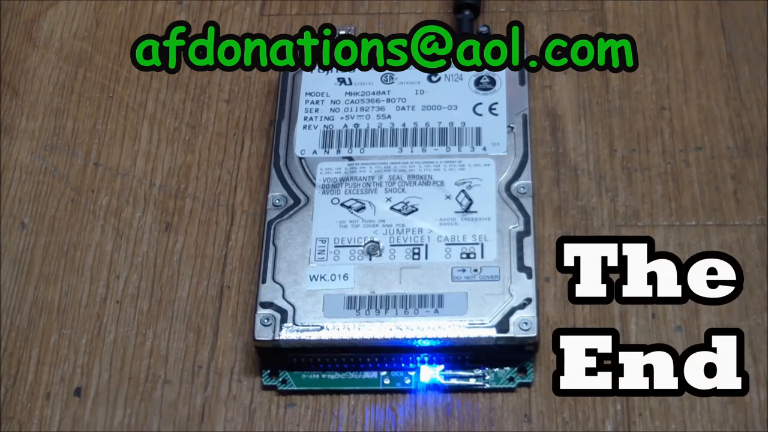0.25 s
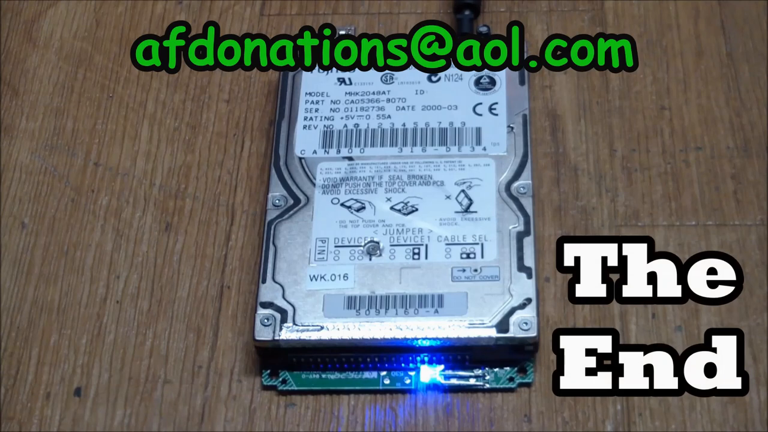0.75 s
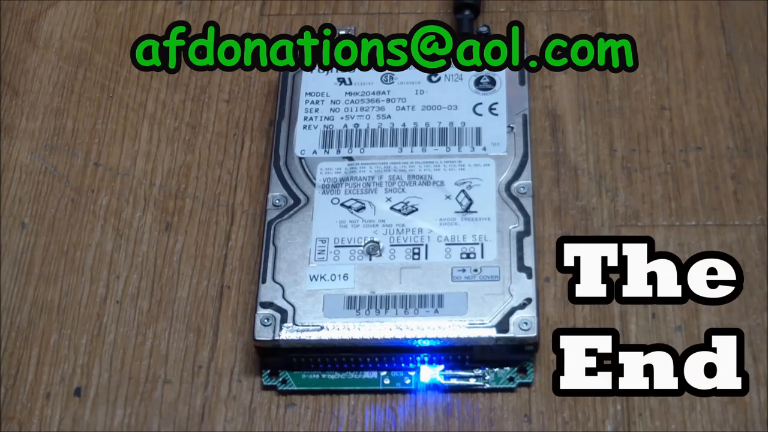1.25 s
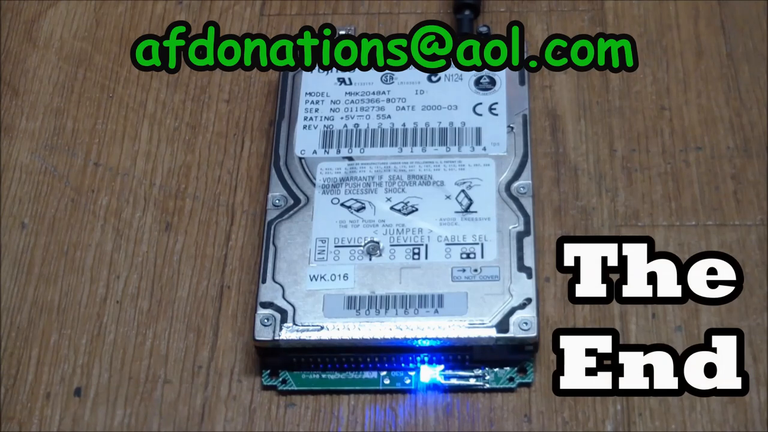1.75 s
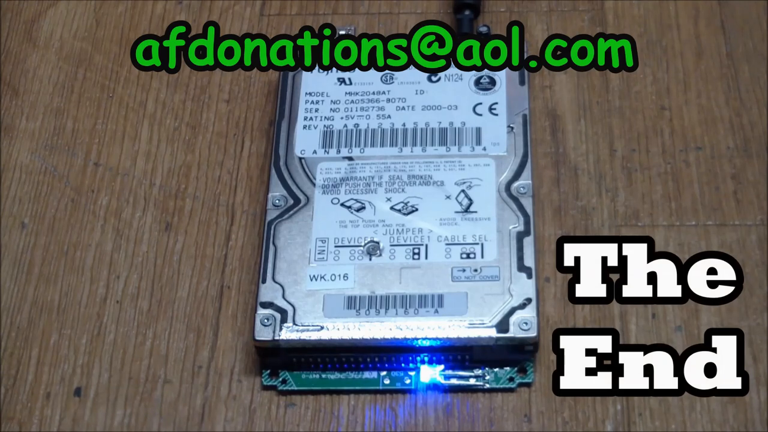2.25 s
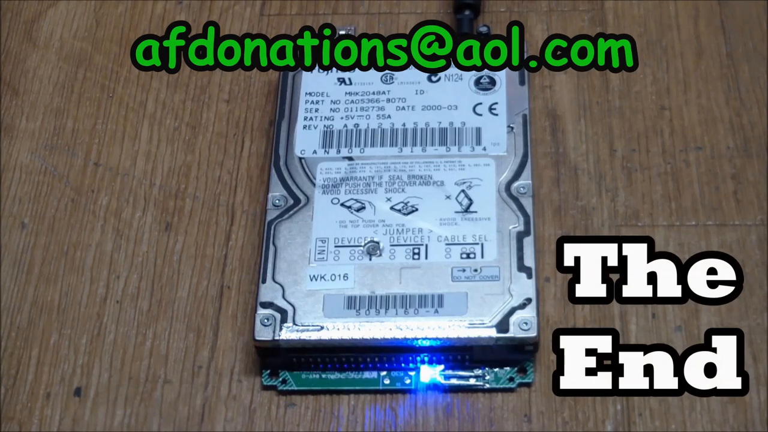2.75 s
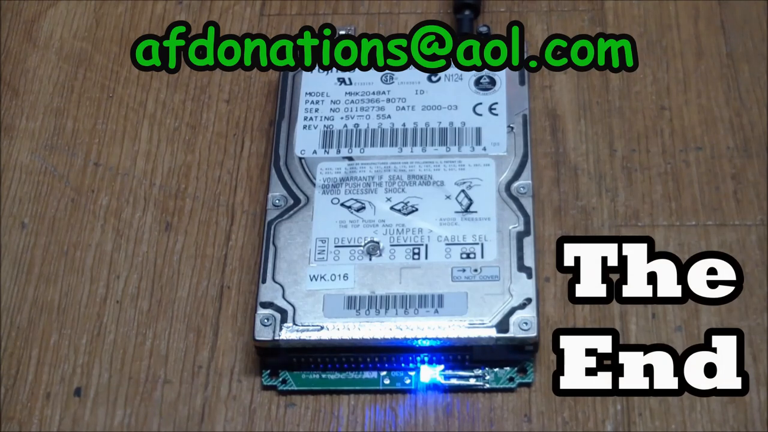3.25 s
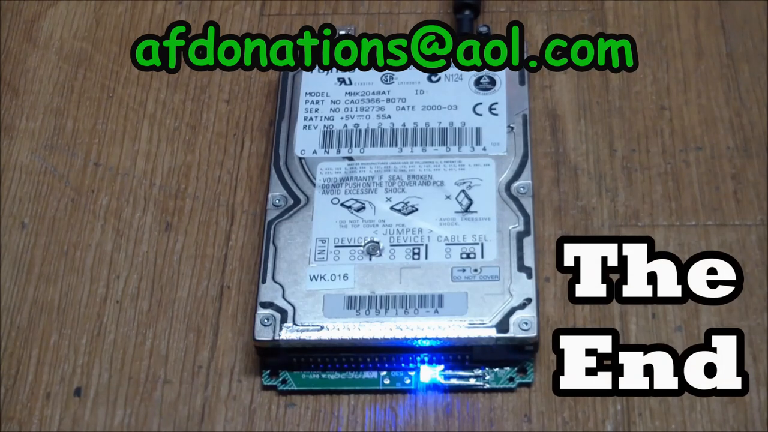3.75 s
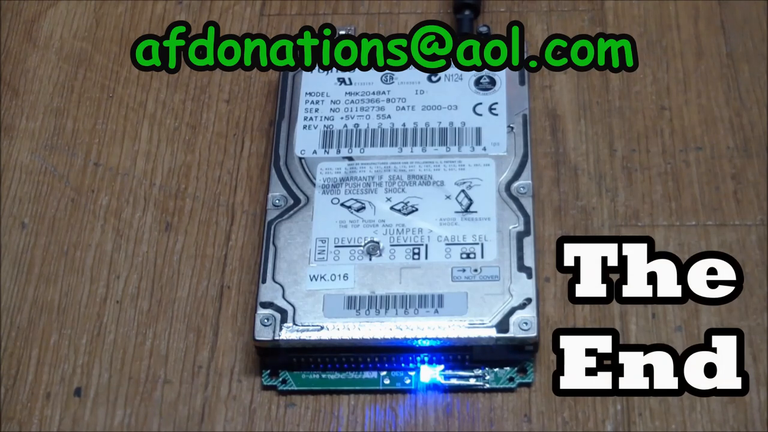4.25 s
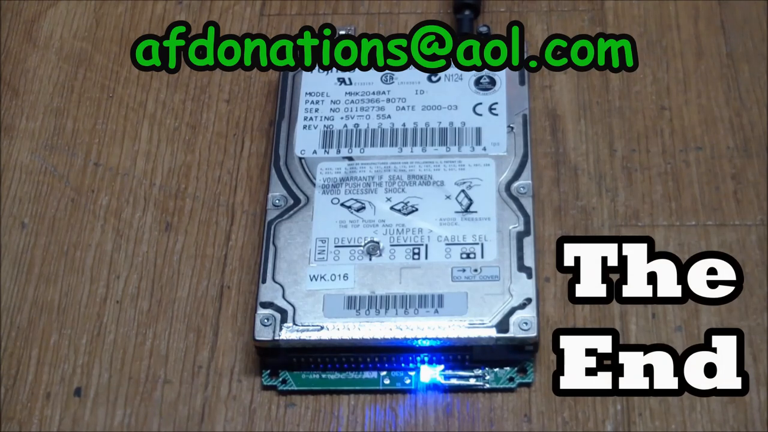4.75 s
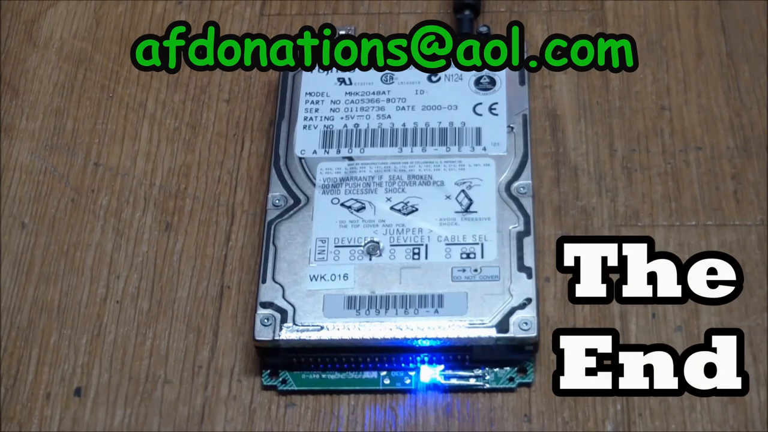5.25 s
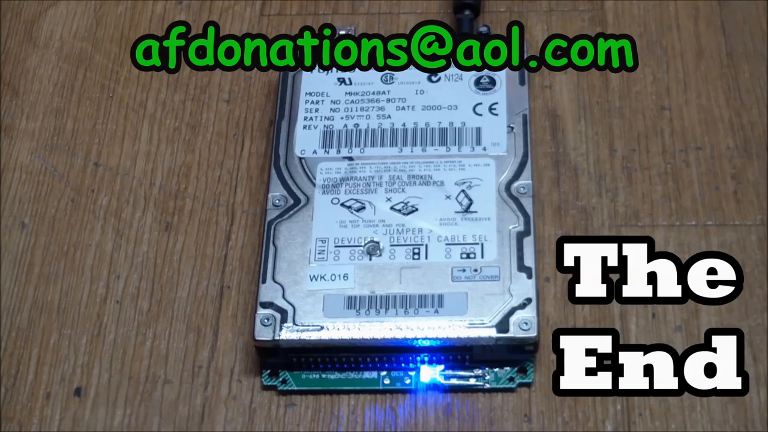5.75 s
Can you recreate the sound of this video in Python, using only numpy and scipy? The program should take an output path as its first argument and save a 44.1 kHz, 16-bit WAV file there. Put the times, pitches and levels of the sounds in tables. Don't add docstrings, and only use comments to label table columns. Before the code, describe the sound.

Sharp, loud clacks from a small disc drive on wood repeat in a regular limping rhythm above faint multi-toned whining, hiss and low rumble.

```python
import sys
import numpy as np
from scipy import signal
from scipy.fft import rfft, irfft, next_fast_len
from scipy.io import wavfile
from scipy.ndimage import uniform_filter1d

SR = 44100
rng = np.random.default_rng(int(sys.argv[2]) if len(sys.argv) > 2 else 0)


def dump_mix(stems):
    frames = np.atleast_2d(stems).T
    limited = np.clip(frames, -1, 1)
    pcm = np.round(limited * 32767).astype(np.int16)
    wavfile.write(sys.argv[1], SR, pcm)


def boost_factor(decibels):
    exponent = np.asarray(decibels, float) / 20
    return 10 ** exponent


N = 263718


def on_log(table, hz):
    f, v = np.transpose(table)
    return np.interp(np.log(np.maximum(hz, 1)), np.log(f), v)


def shaped(x, gain):
    size = next_fast_len(N)
    return irfft(rfft(x, size) * gain(np.fft.rfftfreq(size, 1 / SR)), size)[:N]


def noise(gain):
    return shaped(rng.standard_normal(N), gain)


def walk(rate_hz):
    hold = int(SR / rate_hz)
    levels = np.repeat(rng.standard_normal(N // hold + 1), hold)
    return 1.3 * uniform_filter1d(uniform_filter1d(levels, hold), hold)[:N]


def add(out, sound, start_s):
    i = round(start_s * SR)
    out[i:i + len(sound)] += sound[:N - i]


def rings(hz, t60_s):
    t = np.arange(SR // 5) / SR
    return np.exp(np.outer(2j * np.pi * hz - np.log(1000) / t60_s, t)).imag


BALL_HZ, CAGE_HZ = 192.885, 29.68
# ball_multiple, cage_multiple, level_db (rms), beat_loudest_s, swell_highest_s
STRONG_LINES = [(12, -1, -60.5, 3.47, 3.0), (12, 1, -55.1, 0.66, 3.0), (14, -1, -68.4, 1.42, 3.0),
                (20, 1, -59.4, 1.79, 8.5), (22, -1, -60.5, 1.98, 8.5), (22, 1, -54.2, 1.35, 4.0),
                (23, -1, -61.6, 1.47, 3.0), (24, -1, -61.2, 0.83, 7.0), (24, 1, -59.4, 0.17, 10.0),
                (25, 1, -64.7, 1.67, 4.5), (26, -1, -62.7, 0.61, 10.5), (26, 1, -51.0, 0.92, 10.0),
                (26, 2, -67.4, 1.68, 2.5), (28, 1, -66.3, 0.43, 4.0), (30, 0, -55.8, 1.12, 9.0),
                (30, 1, -59.8, 1.39, 8.5), (32, 0, -66.6, 0.74, 2.5), (36, 0, -64.2, 0.55, 2.0),
                (38, 0, -66.4, 0.89, 3.5), (42, 0, -62.8, 0.52, 10.0), (46, 0, -65.1, 0.0, 9.5),
                (54, 0, -66.4, 0.22, 2.5), (54, 1, -63.3, 0.48, 7.5), (66, -1, -69.8, 0.09, 2.0)]
# pitch_hz, level_db (rms)
CARRIER_LEVELS = [(2700, -71), (5400, -66.5), (6600, -71.5), (8800, -68), (11000, -72), (12000, -79),
                  (14700, -79)]
# pitch_hz, level_db (rms)
SIDEBAND_LEVELS = [(2900, -71.5), (3600, -71), (4500, -66), (6000, -68.5), (8000, -74.5), (9600, -71.5),
                   (11500, -78), (14700, -73.5)]
# pitch_hz, change_db
ODD_MULTIPLES = [(2900, -12), (4400, -2), (5200, -5), (7100, -4), (9000, -9.5), (12000, -5), (14500, -2.5)]


def bearing_lines(lowest=14, highest=80, heard=80, scatter_db=1.5):
    taken = [tuple(row[:2]) for row in STRONG_LINES]
    pairs = [(b, c) for b in range(lowest, highest + 1) for c in (-1, 0, 1) if (b, c) not in taken]
    ball, cage = np.transpose(pairs)
    hz = ball * BALL_HZ + cage * CAGE_HZ
    scatter, swell_time, beat_time = rng.standard_normal((len(ball), 3)).T
    db = np.where(cage == 0, on_log(CARRIER_LEVELS, hz), on_log(SIDEBAND_LEVELS, hz))
    db = db + on_log(ODD_MULTIPLES, hz) * (ball % 2) + scatter_db * scatter
    rows = np.transpose([ball, cage, db, 10 * beat_time, 10 * swell_time])
    return np.vstack([STRONG_LINES, rows[np.argsort(-db)[:heard]]]).T


def comb(turns_s, hz, start, lean, sizes, slips):
    out = np.zeros((2, N), np.float32)
    for k in range(len(hz)):
        cycles = hz[k] * turns_s + start[k] + slips[k % len(slips)]
        angle = np.float32(2 * np.pi * (cycles - np.rint(cycles)))
        size = np.repeat(np.float32(sizes[k]), 256)[:N]
        out[0] += size * np.sin(angle)
        out[1] += np.float32(lean[k]) * size * np.cos(angle)
    return out


def spindle(kick=.0025, sag=0.001983, swell_db=.5, side_db=-12, trim_db=0.44):
    t, speed = np.arange(N) / SR, 1 + .0001 * walk(2.95)
    changes = [(s - .07, kick) for s, _ in REBOUNDS] + [(s + 0.018, -sag) for s, _ in LONE_STEPS]
    for s, share in changes:
        late = np.maximum(t - s, 0) / 0.0477
        speed = speed + share * late * np.exp(1 - late)
    ball, cage, db, loudest_s, highest_s = bearing_lines()[:, :, None]
    slow = t[::256]
    beat_hz, second_share = .021, .42
    beat = np.abs(1 + second_share * np.exp(2j * np.pi * beat_hz * ball * (slow - loudest_s)))
    tide_s, tide_db = 12, 4
    tide = tide_db * np.cos(2 * np.pi * (slow - highest_s) / tide_s)
    swells = np.array([swell_db * walk(1.5)[::256] for _ in range(7)])
    swell = swells[np.arange(len(db)) % len(swells)]
    sizes = np.sqrt(2) * beat * boost_factor(db + trim_db + tide + swell)
    slips = np.array([.3 * walk(1.5) for _ in range(7)])
    start, lean = rng.random((len(db), 2)).T
    lag = np.sign(lean - .5) * boost_factor(side_db - 14 * lean)
    hz = (ball * BALL_HZ + cage * CAGE_HZ)[:, 0]
    mid, side = comb(np.cumsum(speed) / SR, hz, start, lag, sizes, slips)
    return np.array([mid + side, mid - side])


# pitch_hz, level_db (rms), waver_db
HUM_LINES = [(60.5, -53, 2.5), (120.3, -47.5, 1.5), (170, -61, 2.5), (801.3, -54.5, .8), (1929, -69, 2)]


def hum():
    t, out = np.arange(N) / SR, 0
    for hz, db, waver_db in HUM_LINES:
        level = boost_factor(db + waver_db * walk(3.95)) * np.sqrt(2)
        out = out + level * np.sin(2 * np.pi * hz * t + 0.93 * walk(1.917))
    return out


# pitch_hz, density_db (per Hz)
AIR_COMMON = [(20, -68.5), (36, -74.5), (60, -72.5), (100, -63.5), (140, -70.5), (300, -86.5), (700, -88),
              (1500, -91.5), (3000, -93.5), (4400, -88.5), (6500, -91), (11500, -94.5), (15000, -96)]
# pitch_hz, density_db (per Hz)
AIR_OPPOSITE = [(20, -79), (200, -84), (700, -93), (1500, -95), (3000, -104), (4400, -101), (5200, -100),
                (11500, -101), (15000, -99)]


def air():
    mid = noise(lambda f: boost_factor(on_log(AIR_COMMON, f)))
    side = noise(lambda f: boost_factor(on_log(AIR_OPPOSITE, f)))
    return boost_factor(0.87 * walk(7.8)) * np.sqrt(SR / 2) * np.array([mid + side, mid - side])


# start_s, level_db, centre_hz
SOFT_KNOCKS = [
    (.002, -49.5, 860),
    (3.333, -40, 590),
    (4.252, -42, 367),
    (5.956, -47, 900),
]


def knocks():
    out, t = 0, np.arange(N) / SR
    for s, db, hz in SOFT_KNOCKS:
        body = noise(lambda f: 1 / (1.1 + (f / hz - hz / (f + 1)) ** 2))
        decay = (t > s) * np.exp(-np.abs(t - s) / 0.023)
        out = out + boost_factor(db) * body / body.std() * decay
    return out


# start_s, level_db
DOUBLE_STEPS = [(0.374, -38.5), (1.393, -41.5), (2.412, -41), (3.93, -41.5), (4.953, -40.5)]
# start_s, level_db
LONE_STEPS = [(0.88, -40.5), (1.9, -41), (3.419, -41), (4.439, -41), (5.456, -41)]
# pitch_hz, t60_s, level_db
ARM_MODES = [(867, 0.11, 1), (1416, 0.092, -15), (1930, 0.074, -16), (4510, 0.024, 2.5), (4740, 0.022, -10),
             (5900, 0.014, -8)]


def coil_steps(scratch_db=-6, sway_db=-3):
    hz, t60_s, db = np.transpose(ARM_MODES)
    three_steps = [(0, 8), (.0108, 3.5), (.0205, 3)]  # delay_s, level_db
    shudder = [(0, 0), (.005, 0.5)]
    steps = [(s + late, level + more) for s, level in LONE_STEPS for late, more in three_steps]
    steps += [(s + late, level + more) for s, level in DOUBLE_STEPS for late, more in shudder]
    out, grit = np.zeros((2, N))
    modes, t = rings(hz, t60_s), np.arange(SR // 10) / SR
    for (s, level), chance in zip(steps, rng.standard_normal((len(steps), len(hz)))):
        add(out, boost_factor(level + db + 0.95 * chance) @ modes, s)
        add(grit, boost_factor(level + scratch_db) * np.exp(-t / 0.009), s)
    sway = t / 0.0032 * np.exp(1 - t / 0.0052) * np.sin(2 * np.pi * 470 * t)
    for s, level in LONE_STEPS:
        add(out, boost_factor(level + sway_db) * sway, s + 0.00926)
    return out + grit * noise(lambda f: 2 / (1 + ((f - 4000) / 1800) ** 2))


# pitch_hz, t60_s, then signed swing [ratio] for blow, lone_blow, rebound
CASE_MODES = [(408.1, 0.139, -0.015, -0.015, -0.001), (493.3, 0.116, -0.01, -0.01, -0.014),
              (663.2, 0.044, -0.017, -0.004, 0.001), (809.4, 0.048, 0.212, 0.229, 0.073),
              (819.4, 0.169, 0.038, 0.037, 0.02), (843.7, 0.098, 0.159, 0.141, 0.112),
              (878.5, 0.127, 0.173, 0.216, 0.476), (881.2, 0.11, -0.355, -0.403, -0.623),
              (900.1, 0.074, -0.298, -0.309, -0.035), (939.6, 0.038, -0.079, -0.095, -0.101),
              (1031.3, 0.055, 0.026, 0.015, 0.01), (1106.5, 0.098, -0.001, -0.009, -0.001),
              (1187.2, 0.009, -0.343, -0.376, -0.183), (1236.7, 0.184, 0.006, 0.01, 0.003),
              (1287.0, 0.032, 0.117, 0.132, 0.037), (1293.8, 0.105, -0.03, -0.034, -0.015),
              (1390.1, 0.021, 0.16, 0.196, 0.056), (1590.9, 0.03, 0.027, 0.057, -0.042),
              (1633.0, 0.032, 0.204, 0.215, 0.109), (1856.1, 0.092, 0.033, 0.037, 0.01),
              (2150.4, 0.005, 0.223, 0.285, 0.078), (2375.3, 0.029, -0.018, -0.03, -0.002),
              (2592.7, 0.011, -0.017, -0.054, 0.009), (2989.3, 0.005, 0.052, 0.037, 0.069),
              (3449.4, 0.016, -0.053, -0.09, 0.044)]
# start_s, level_db
DOUBLE_BLOWS = [(0.4396, 0.5), (1.458, 0.0), (2.47646, 0), (3.9963, 0.5), (5.0153, 0)]
# start_s, level_db
REBOUNDS = [(0.5011, -1.5), (1.518, -0.5), (2.5364, -0.5), (4.0569, -1), (5.0748, -1)]
# start_s, level_db
SINGLE_BLOWS = [(0.9198, 0.5), (1.9386, 0.5), (3.45844, 0.5), (4.4776, 0.5), (5.4968, 0.5)]


def arm_stops(contact_s=.00036, bounce_s=.01067, bounce_share=.637):
    hz, t60_s, blow, lone, rebound = np.transpose(CASE_MODES)
    length = round(contact_s * SR)
    push = np.sin(np.pi * (np.arange(length) + .5) / length)
    hits = [(s, db, blow) for s, db in DOUBLE_BLOWS] + [(s, db, lone) for s, db in SINGLE_BLOWS]
    for s, db in REBOUNDS:
        hits += [(s, db, rebound), (s + bounce_s, db, bounce_share * rebound)]
    out, modes = np.zeros(N), rings(hz, t60_s)
    for (s, db, swing), chance in zip(hits, rng.standard_normal((len(hits), len(hz)))):
        add(out, boost_factor(db) * swing * boost_factor(.15 * chance) @ modes, s)
    return np.convolve(out, push / push.sum())[:N]


def rattle(tail_db=-34, crack_db=-23, long_db=-36):
    t, (crack, tail, long) = np.arange(SR // 3) / SR, np.zeros((3, N))
    hits = list(DOUBLE_BLOWS) + list(SINGLE_BLOWS) + [(s, db - 5) for s, db in REBOUNDS]
    for s, db in hits:
        add(crack, boost_factor(2.5 * db) * np.exp(-t / .003), s)
        add(tail, boost_factor(db) * np.exp(-t / 0.038) * (1 - np.exp(-t / 0.00034)), s)
        add(long, boost_factor(db) * np.exp(-t / 0.053) * (1 - np.exp(-t / 0.003)), s)
    bright = noise(lambda f: f ** 2 / (f ** 2 + 2800 ** 2) / (0.1 + (f / 4500) ** 2).clip(0, 5))
    mid = noise(lambda f: 4 * f ** 4 / (f ** 4 + 600 ** 4) / (1 + (f / 1800) ** 3))
    main = noise(lambda f: 14 / (1 + ((f - 885) / 55) ** 2))
    return boost_factor(crack_db) * crack * bright + boost_factor(tail_db) * tail * mid + boost_factor(long_db) * long * main


def scene():
    hits = arm_stops() + rattle() + coil_steps() + knocks()
    lean = 0.0095 * hits + 0.022 * (np.roll(hits, 9) - np.roll(hits, 20))
    return np.array([hits + lean, hits - lean]) + spindle() + hum() + air()


def band_limit(x):
    return signal.sosfilt(signal.butter(12, 16290, fs=SR, output="sos"), x)


# pitch_hz, left_minus_right_db
PORT_BALANCE = [(25, 3), (250, -0.3), (4000, -0.05), (12000, 2)]


def record(dry):
    top_hz = 15750
    ports = []
    for x, sign in zip(dry, (1, -1)):
        ports.append(shaped(x, lambda f: boost_factor(sign * on_log(PORT_BALANCE, f) / 2) * (f < top_hz)))
    return band_limit(np.array(ports))


dry = scene()
out = record(dry)
dump_mix(out)
```